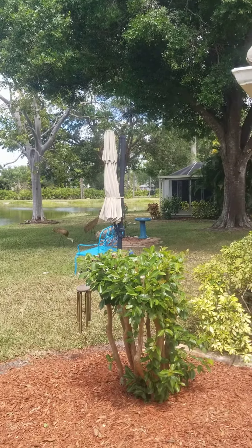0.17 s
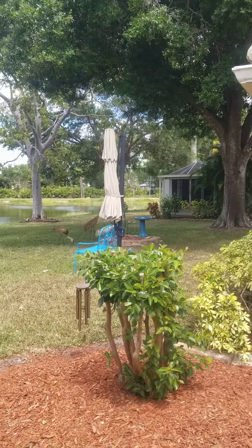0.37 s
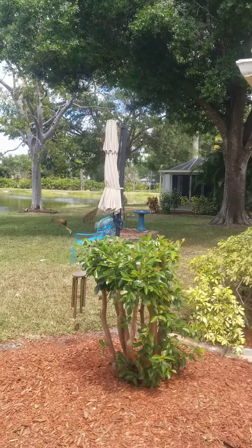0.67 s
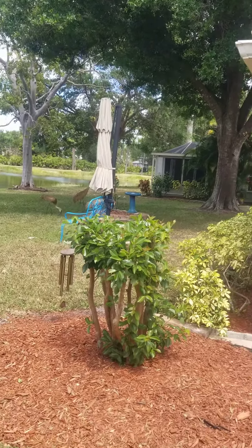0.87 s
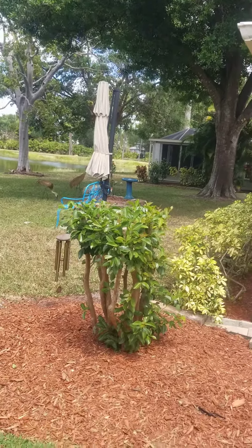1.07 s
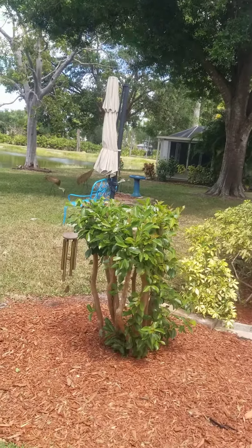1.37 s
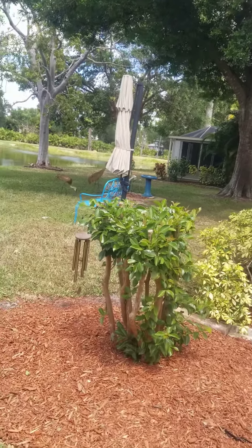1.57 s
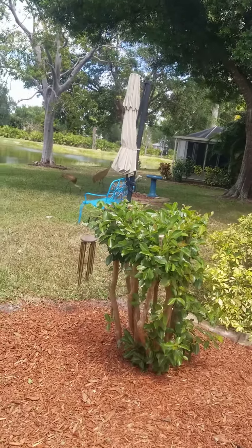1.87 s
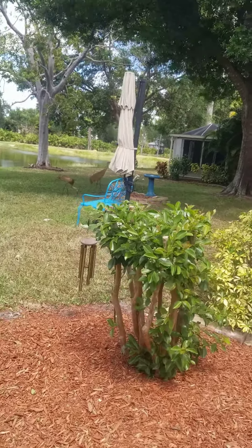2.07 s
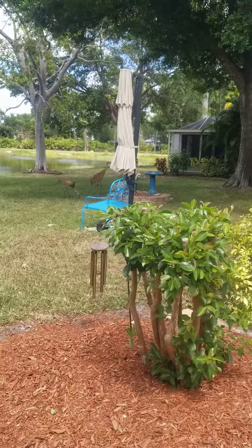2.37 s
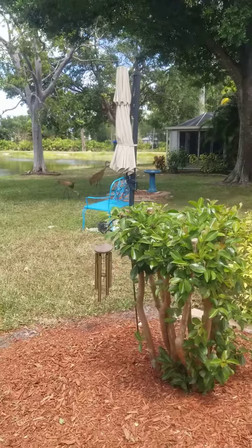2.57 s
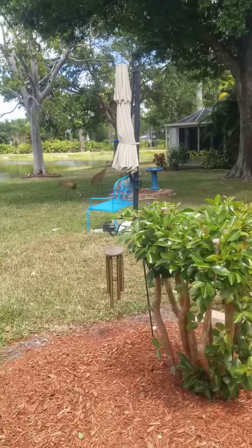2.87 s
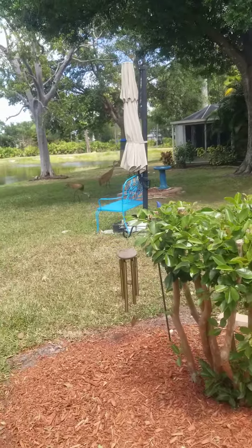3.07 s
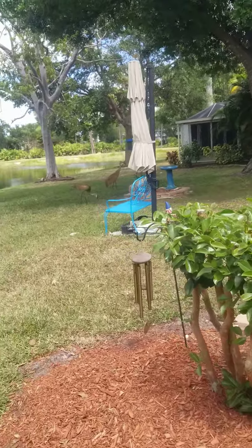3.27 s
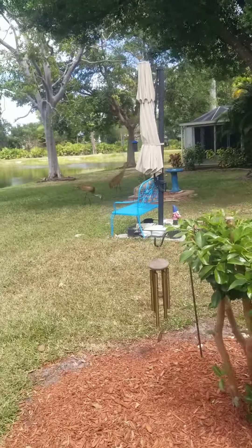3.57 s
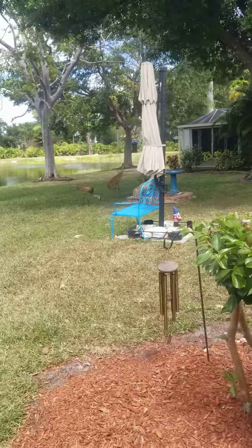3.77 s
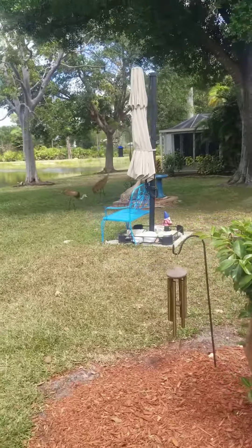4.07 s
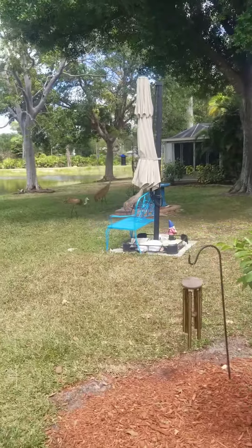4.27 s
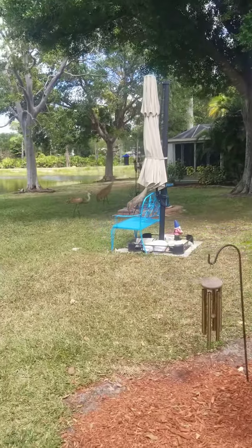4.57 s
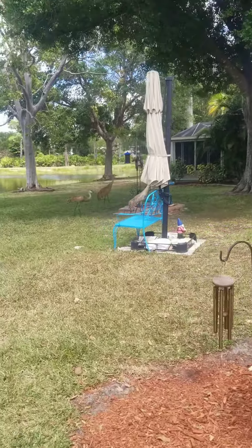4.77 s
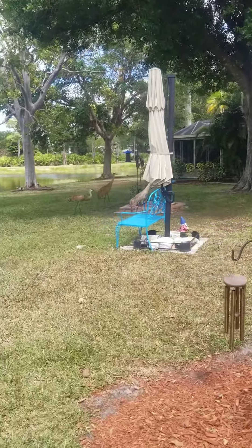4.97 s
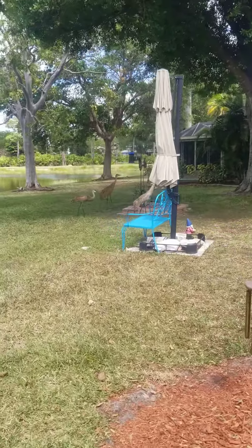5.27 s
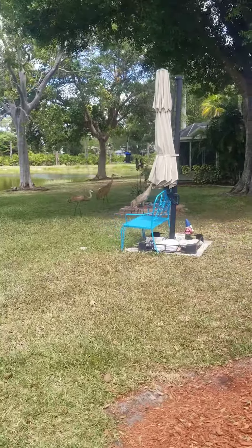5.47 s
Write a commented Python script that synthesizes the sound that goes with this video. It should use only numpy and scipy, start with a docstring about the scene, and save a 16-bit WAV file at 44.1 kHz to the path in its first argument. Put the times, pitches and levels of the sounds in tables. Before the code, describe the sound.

In a windy backyard, a pair of large birds lets out two short bursts of throaty, woody rattling, echoing off trees and a house.

```python
"""Crane duet across a lawn

Two cranes rattle in duet twice. A low held note opens each call; double pulses follow, mellow beats near
790 Hz and raspy beats near 920 Hz overlapping, over soft low beats: swept tones, harmonic stacks, coloured noise.
Trees and a house wall return the calls as dying noise. Wind buffets two microphone ports with low turbulence,
leaves hiss as filtered noise, an insect buzzes once, and gliding sines give far bird notes.
A thin tone wavers near 1567 Hz and one small tick sounds."""
import sys
import numpy as np
from scipy import signal
from scipy.fft import rfft, irfft
from scipy.io import wavfile

SR = 44100
rng = np.random.default_rng(int(sys.argv[2]) if len(sys.argv) > 2 else 0)


def int16_out(signal):
    """Quantize to a 16-bit WAV file."""
    q = np.round(np.clip(np.atleast_2d(signal).T, -1, 1) * 32767)
    wavfile.write(sys.argv[1], SR, q.astype(np.int16))


N = 248283
T = np.arange(N) / SR
SIDES = np.array([[.5], [-.5]])   # shares a left-right difference between the two ports

# Cranes' mellow and raspy rattle beats, each a double pulse: kind, first_top_s, peak_db, pitch_hz,
# rasp_db (before the mix), second_after_ms, second_db (re first)
RATTLE_BEATS = [("mellow 1", 1.0865, -17.5, 800, -37, 8.3, 3),
                ("mellow 1", 1.1562, -15.5, 809, -35, 8.1, 0.7),
                ("mellow 1", 1.2184, -19.5, 800, -34, 7.8, 0.99),
                ("mellow 1", 1.2763, -22.5, 810, -40.5, 8.1, 5),
                ("raspy 1", 1.2855, -24, 880, -38.5, 6.3, 8),
                ("mellow 1", 1.3289, -21.5, 765, -41.5, 8.42, 3),
                ("raspy 1", 1.3533, -19.5, 930, -27, 6.28, 6),
                ("mellow 1", 1.3857, -24.5, 800, -46, 15.4, 0.2),
                ("raspy 1", 1.4142, -18.5, 925, -29, 6.3, 5.6),
                ("raspy 1", 1.4707, -18, 908, -29.5, 6.24, 5.1),
                ("raspy 1", 1.5235, -19.5, 920, -28.5, 5.8, 6.2),
                ("raspy 1", 1.5724, -19.5, 911, -26, 6.64, 5.5),
                ("raspy 1", 1.6175, -21.5, 880, -35, 7.1, 5.4),
                ("mellow 2", 3.6038, -19, 782, -43.5, 9.5, 2.2),
                ("mellow 2", 3.6736, -18, 774, -44, 9.7, 0.71), ("raspy 2", 3.7265, -19, 900, -41, 9.95, 2),
                ("mellow 2", 3.7431, -20.5, 780, -44.5, 6.5, 0.1),
                ("mellow 2", 3.7882, -24, 753, -44, 9.5, -8),
                ("raspy 2", 3.7953, -13, 873, -38.5, 10.9, -2.5),
                ("mellow 2", 3.843, -22.5, 774, -42.5, 9.5, -7.5),
                ("raspy 2", 3.856, -15, 945, -34, 9, -0.7), ("mellow 2", 3.8922, -24.5, 821, -43, 9.3, -10),
                ("raspy 2", 3.9117, -13, 945, -36.5, 10.8, -2.3),
                ("raspy 2", 3.9657, -14.5, 945, -33, 9.6, -1.2),
                ("raspy 2", 4.0165, -21, 945, -36, 9.2, 2.2),
                ("raspy 2", 4.0618, -17.5, 940, -35, 9.3, 0.1),
                ("raspy 2", 4.1066, -20, 816, -48.5, 9.5, -4)]
# What a kind of beat shares within call 1 or 2: first_width_ms and second_width_ms (before widening),
# first_left_right_db, second_left_right_db, second_shift_hz, second_rasp_db (re first),
# third_db (faint third pulse, re second), rasp_width_ms
BEAT_KINDS = {"mellow 1": (6, 6.0, 2, 1.5, -15, -2.5, -9, 5.5),
              "raspy 1": (5.5, 4.6, -0.5, 1, 40, -15, -11, 3.5),
              "mellow 2": (7, 7, 3, 5.5, -12, -3, -24.5, 8.5),
              "raspy 2": (5, 4.5, -2, -0.5, 35, 0.1, -5.5, 4.5)}
# Faint third pulse: delay after the second, width, rasp re second
THIRD_AFTER_S, THIRD_MS, THIRD_RASP_DB = .0068, 2.6, -7
# Overtone level for a 0 dB peak, before the trims; loud pulses are purer (dB per dB)
OVERTONE_DB, OVERTONE_SLOPE = -28, -.6

# Soft low beats, with a faint return closing each call: start_s (the top comes 4.4 ms later),
# second_partial_peak_db, second_partial_hz, first_partial_db (re second)
LOW_BEATS = [(1.104, -32, 1230, -1.5), (1.1722, -32, 1235, -5.5), (1.233, -33, 1260, 1),
             (1.278, -30, 1190, -6.5), (1.333, -33.5, 1170, -8.5), (1.383, -33.5, 1320, -7.5),
             (1.431, -37.5, 1234, 0), (1.661, -43, 1398, 7.5), (3.6197, -34.5, 1237, 1),
             (3.6404, -34.5, 1180, -15.5), (3.693, -32.5, 1180, -14), (3.753, -35, 1250, -18),
             (3.7943, -30.5, 1211, -5), (3.849, -30.5, 1184, -1), (3.896, -34, 1340, 3),
             (4.152, -42, 1301, 5)]
# Two low held notes: second_partial_db (re first), then rows of time_s, level_db (before flutter)
HELD_NOTES = [(-1, [(0.956, -59.5), (0.976, -46), (1.0, -38.5), (1.018, -43), (1.03, -49), (1.06, -55.5),
              (1.08, -50.5)]), (-6, [(3.471, -60), (3.486, -53), (3.497, -47.5), (3.519, -42),
              (3.537, -38.5), (3.552, -54), (3.6, -50)])]
# Partials 3 to 8 of the low voice: level_db (re first, before a trim)
UPPER_PARTIALS_DB = [-15, -18, -20, -28, -30, -33]
# The held note's pitch climbs and settles
OPEN_FROM_HZ, OPEN_TO_HZ, OPEN_RISE_S = 500, 597, .033
# A croak early in the held note over a faint rest: peak, top after the start, width, rest
CROAK_DB, CROAK_TOP_S, CROAK_WIDTH_S, CROAK_REST_DB = -39, .016, .03, -52

# Noise colours of the voices: pitch_hz, relative_db (per Hz)
THROAT_COLOUR = [(500, -13), (1050, 2.5), (1400, -1), (2100, -7), (2500, -24.5), (3000, -16.5),
                 (4500, -23.5), (7000, -37)]   # breath in the voice
RASP_COLOUR = [(2000, -48.5), (3500, -12.5), (5000, -9.5), (8000, -20), (9700, -15), (12200, 0.5),
               (14300, -18), (16200, -9.5)]
CROAK_COLOUR = [(450, -38), (650, 5.5), (800, 11.5), (1000, 1), (1500, -42), (3000, -61)]   # throaty start of the held note
# Port balance: voice noise leans right at low pitches and left at high ones: pitch_hz, left_right_db
VOICE_BALANCE = [(500, -7), (1300, -10.5), (2400, 17.5), (4400, 12.5), (8000, 24.5), (15000, 12)]
# Returns from trees and wall: pitch_hz, t60_s, relative_db
ECHO_BANDS = [(500, 0.48, 7), (756, 0.39, -1.5), (1000, 0.46, 1), (1510, 0.52, 0), (3900, 0.42, 3.5),
              (12000, 0.42, -1.5)]

# Single blows of wind on a port: top_s, peak_db, pitch_hz, width_ms, left_right_db
WIND_BLOWS = [(1.58, -35, 59, 23, 7), (1.82, -26, 58, 21, 0.5), (2.1, -29, 74.5, 38, -12),
              (3.31, -26, 80, 22, 6), (3.39, -28, 70, 20, 10), (4.66, -30, 200, 14, -10),
              (4.676, -20, 75.4, 21, -3), (4.811, -25, 161, 11, 14), (4.825, -26.5, 65.4, 26, -11.5),
              (5.125, -26, 106.7, 22, 11.5), (5.201, -25, 98, 23.6, 11.5), (5.28, -33, 150, 12, -8)]
# Far bird notes: start_s, top_s, end_s, start_hz, top_hz, end_hz, level_db (at the top, before blur), left_right_db
FAR_NOTES = [(1.96, 1.98, 2.09, 2520, 2570, 2800, -61, -2), (2.055, 2.07, 2.11, 4100, 4000, 3850, -63, 5),
             (2.10, 2.12, 2.17, 2790, 2820, 2870, -55, 0), (2.13, 2.23, 2.43, 8600, 8740, 8150, -78, 8),
             (2.44, 2.595, 2.78, 1550, 1505, 1450, -50.5, -5),
             (3.11, 3.16, 3.22, 1060, 1150, 1220, -63, -5), (3.16, 3.19, 3.27, 1600, 1570, 1470, -61, -5),
             (3.38, 3.44, 3.48, 1120, 1220, 1270, -58, -5)]
# Spread of the blur in Hz, then how far below the top a note starts and ends
NOTE_BLUR_HZ, NOTE_RISE_DB, NOTE_FALL_DB = 70, 18, 20
# Insect's attack, hold and release: time_s, level_db (of the main resonance)
INSECT_LEVEL = [(0.43, -105), (0.47, -73.5), (0.61, -73.5), (0.8, -97)]
# Thin wavering tone: time_s, level_db
WHINE_LEVEL = [(0, -73.5), (.9, -86), (1.8, -80), (3.0, -78), (3.45, -86), (4.15, -72), (4.6, -70),
               (5.0, -89.5)]
TICK_S, TICK_DB = 2.153, -55   # top and level before dulling

# Strength of the wind on the ports: time_s, level_db (before lumps and sway)
WIND_LEVEL = [(0.0, -42.5), (0.85, -40), (1.2, -37.5), (1.7, -39.5), (2.1, -36), (2.25, -39.5), (3.17, -39),
              (3.3, -33), (3.5, -32), (3.67, -38.5), (4.2, -36.5), (4.35, -43), (4.62, -41), (4.68, -31),
              (4.77, -37), (4.83, -31), (5.2, -29), (5.3, -35), (5.36, -45), (5.63, -42)]
# Wind turbulence: pitch_hz, relative_db (per Hz)
WIND_COLOUR = [(13, -37.5), (22, -30.5), (54, 4), (103, -0.5), (132, -4), (216, -15.5), (286, -26),
               (420, -34), (550, -40), (920, -120)]
# The ports hear alike in calm and apart in stiff wind; spread and mean of the left-right sway
CALM_DB, STIFF_DB, SWAY_DB, LEAN_DB = -43.5, -30, 5, 2
# Leaves and far noise, before flicker: time_s, murmur_db, rustle_db, hiss_db
AIR_LEVELS = [(0.0, -65.5, -81, -72.5), (1.9, -64, -79, -71), (2.04, -62.5, -82, -70),
              (2.1, -58.5, -71.5, -64.5), (2.4, -62, -70.5, -71.5), (2.66, -61.5, -68.5, -71),
              (2.74, -59.5, -73.5, -67.5), (2.86, -63, -78.5, -70), (3.04, -63, -76.5, -66.5),
              (3.3, -62, -78, -73), (4.35, -63, -81, -73.5), (4.6, -63.5, -80, -66.5),
              (5.17, -66.5, -81, -74), (5.34, -70.5, -81, -76.5), (5.63, -69, -80, -70.5)]
# Colours of the air layers: pitch_hz, relative_db (per Hz)
MURMUR_COLOUR = [(160, -33.5), (280, -13), (660, -14), (980, -19), (1230, -21.5), (1620, -21.5),
                 (1660, -21), (2800, -32.5), (3640, -65.5), (6160, -120)]
RUSTLE_COLOUR = [(2000, -27.5), (2600, -7), (3000, -3), (3500, -6), (4000, -3.5), (4800, -7.5),
                 (6500, -24.5), (9000, -49.5)]
HISS_COLOUR = [(3820, -38.5), (6500, -22), (7490, -24.5), (8690, -19), (9600, -12.5), (12100, -0.5),
               (15200, -9), (16200, -15)]
# Port balance of the air: pitch_hz, left_right_db
AIR_BALANCE = [(60, 3), (180, 0), (550, 0), (1650, 6), (4970, 11.5), (15000, 2.5)]

PORT_LAG = 6   # samples by which the right port hears later
CUTOFF_HZ = 16500


def amp(db):
    """dB to gain."""
    return 10 ** (np.asarray(db) / 20)


def rms_one(x):
    """Scale to rms 1."""
    return x / np.sqrt(np.mean(x ** 2) + 1e-20)


def in_time(rows):
    """Columns of a timed table joined by straight lines."""
    time_s, *columns = np.transpose(rows)
    return [np.interp(T, time_s, column) for column in columns]


def at_hz(points):
    """A pitch table joined along log frequency on the FFT grid."""
    hz, value = np.transpose(points)
    grid_hz = np.arange(N // 2 + 1) * SR / N
    return np.interp(np.log(grid_hz + 1), np.log(hz), value)


def colour(x, spectrum, balance=((100, 0), (200, 0))):
    """Stereo filter from a spectrum and a left-right balance; rms 1."""
    gain = amp(at_hz(spectrum) + SIDES * at_hz(balance))
    return rms_one(irfft(rfft(x) * gain, N))


def band_pass(x, order, low_hz, high_hz):
    """Butterworth band of a sound."""
    return signal.sosfilt(signal.butter(order, [low_hz, high_hz], "band", fs=SR, output="sos"), x)


def drift(rate_hz):
    """Random wander below rate_hz, of rms 1."""
    sos = signal.butter(2, rate_hz, fs=SR, output="sos")
    settle = SR // 2
    return rms_one(signal.sosfilt(sos, rng.standard_normal(N + settle))[settle:])


def hump(top_s, width_s, rise=0.83):
    """Sample span and bell, width at half height; rise under 1 makes the attack steeper than the release."""
    span = slice(int((top_s - 2 * width_s) * SR), int((top_s + 3 * width_s) * SR))
    t = T[span] - top_s
    side_width = width_s * np.where(t < 0, rise, 2 - rise)
    return span, np.exp(-np.log(16) * (t / side_width) ** 2)


def breath(envelope, spectrum, balance):
    """Turbulent air: coloured noise under an envelope, partly shared by the ports, at the envelope's rms."""
    shared = rng.standard_normal(N)
    noise = .5 * shared + .85 * rng.standard_normal((2, N))
    return np.sqrt(np.mean(envelope ** 2)) * colour(envelope * noise, spectrum, balance)


def pulses():
    """Each beat as three pulses, in time order: s, dB, Hz, ms, overtone dB, rasp dB, left-right dB, rasp ms."""
    rows = []
    for kind, s, db, hz, rasp_db, gap_ms, second_db in RATTLE_BEATS:
        ms1, ms2, pan1, pan2, shift_hz, rasp2_db, third_db, rasp_ms = BEAT_KINDS[kind]
        second_s = s + gap_ms / 1000
        second_rasp_db = rasp_db + rasp2_db
        rows += [(s, db, hz, ms1, rasp_db, pan1, rasp_ms),
                 (second_s, db + second_db, hz + shift_hz, ms2, second_rasp_db, pan2, rasp_ms),
                 (second_s + THIRD_AFTER_S, db + second_db + third_db, hz, THIRD_MS,
                  second_rasp_db + THIRD_RASP_DB, (pan1 + pan2) / 2, rasp_ms)]
    return sorted((s, db, hz, ms, OVERTONE_DB + OVERTONE_SLOPE * db, *rest) for s, db, hz, ms, *rest in rows)


def rattle(widen, fall_hz_per_s, clean_db, throat_db, rasp_lead_s):
    """Phase runs on through both cranes' mellow and raspy beats; pulses open it for a few falling cycles."""
    tone, puffs, air_flow = np.zeros((2, N)), np.zeros(N), np.zeros(N)
    rows = pulses()
    s_all, _, hz_all = np.transpose(rows)[:3]
    phase = 2 * np.pi * np.cumsum(np.interp(T, s_all, hz_all)) / SR
    for s, db, hz, ms, over_db, rasp_db, pan_db, rasp_ms in rows:
        span, bell = hump(s, widen * ms / 1000, rise=0.7)
        # the membrane slackens during a beat
        turn = phase[span] - np.pi * fall_hz_per_s * (T[span] - s) ** 2
        # overtones lead the tone by about 1 ms and are shorter
        early = np.roll(bell, -SR // 1000) ** 2.5
        partials = np.sin(2 * turn) + amp(-8.5) * np.sin(3 * turn) + amp(-16.0) * np.sin(4 * turn)
        overtones = amp(over_db + clean_db) * partials
        tone[:, span] += amp(db + SIDES * pan_db) * (bell * np.sin(turn) + early * overtones)
        air_flow[span] += amp(db + over_db + throat_db) * bell
        span, bell = hump(s - rasp_lead_s, rasp_ms / 1000, rise=.5)
        puffs[span] += amp(rasp_db) * bell * (1 + np.cos(phase[span]))   # one puff a cycle
    voice = tone + breath(air_flow, THROAT_COLOUR, VOICE_BALANCE)
    return voice, breath(puffs, RASP_COLOUR, VOICE_BALANCE)


def low_voice(phase, second_db, upper_db):
    """Harmonic stack of a low note: eight partials of one vibration."""
    levels = [0, second_db] + [db + upper_db for db in UPPER_PARTIALS_DB]
    return sum(amp(db) * np.sin((k + 1) * phase + k * k) for k, db in enumerate(levels))


def low_notes(width_s, flutter_db, throat_db, rasp_db, pan_db):
    """Harmonic voice: a held, fluttering note with a noisy croak in it, then soft, breathy beats."""
    voice, air_flow, croak = np.zeros(N), np.zeros(N), np.zeros(N)
    for second_db, rows in HELD_NOTES:
        start_s, end_s = rows[0][0], rows[-1][0]
        on = (T > start_s) & (T < end_s)
        since = np.maximum(T - start_s, 0)
        hz = OPEN_TO_HZ - (OPEN_TO_HZ - OPEN_FROM_HZ) * np.exp(-(since / OPEN_RISE_S) ** 2)
        phase = 2 * np.pi * np.cumsum(hz * (1 + .018 * drift(45))) / SR
        upper_db = -8 * np.exp(-((T - start_s) / .03) ** 2)   # upper partials come in late
        level = on * amp(in_time(rows)[0] + flutter_db * drift(69.6))
        voice += np.sqrt(2) * level * low_voice(phase, second_db, upper_db)
        air_flow += amp(-13) * level
        croak += on * amp(CROAK_REST_DB)
        span, bell = hump(start_s + CROAK_TOP_S, CROAK_WIDTH_S, rise=.6)
        croak[span] += on[span] * amp(CROAK_DB) * bell
    for s, db, second_hz, first_db in LOW_BEATS:
        span, bell = hump(s + 0.0044, width_s)
        phase = np.pi * second_hz * T[span]   # the first partial lies an octave below the second
        voice[span] += amp(db + first_db) * bell * low_voice(phase, -first_db, -1.0)
        air_flow[span] += amp(db) * bell
    voice += breath(croak, CROAK_COLOUR, VOICE_BALANCE)[0]   # same croak at both ports
    throat = amp(throat_db) * breath(air_flow, THROAT_COLOUR, VOICE_BALANCE)
    rasp = amp(rasp_db) * breath(air_flow, RASP_COLOUR, VOICE_BALANCE)
    return voice * amp(SIDES * pan_db) + throat + rasp


def echoes(x, onset_s, alike):
    """Dense returns from trees and walls: noise dying band by band, partly shared by both ports."""
    t = T[:SR]
    shared, tail = rng.standard_normal(SR), np.zeros((2, SR))
    noise = alike * shared + np.sqrt(1 - min(alike, .99) ** 2) * rng.standard_normal((2, SR))
    edges = 300 * 2 ** np.arange(0, 6.1, .5)   # half octaves
    hz, t60, db = np.transpose(ECHO_BANDS)
    for k, (low, high) in enumerate(zip(edges, edges[1:])):
        band = band_pass(np.roll(noise, 999 * k, axis=1), 2, low, high)
        centre = np.sqrt(low * high)
        tail += band * amp(np.interp(centre, hz, db) - 60 * t / np.interp(centre, hz, t60))
    tail *= 1 - np.exp(-(t / onset_s) ** 2)
    tail /= np.sqrt(np.sum(tail ** 2) / 2)   # unit energy, averaged over the ports
    return signal.fftconvolve(x, tail, axes=1)[:, :N]


def buffets():
    """Each blow swings the port membrane for a cycle or two."""
    out = np.zeros((2, N))
    for s, db, hz, ms, pan_db in WIND_BLOWS:
        span, bell = hump(s, ms / 1000)
        swing = np.cos(2 * np.pi * hz * (T[span] - s))
        out[:, span] += amp(db + SIDES * pan_db) * bell * swing
    return out


def far_birds():
    """Gliding whistles blurred by the leaves they pass through."""
    out = np.zeros((2, N))
    for start, top, end, from_hz, top_hz, to_hz, db, pan_db in FAR_NOTES:
        span = slice(int(start * SR), int(end * SR))
        t, corners = T[span], [start, top, end]
        swell = amp(np.interp(t, corners, [db - NOTE_RISE_DB, db, db - NOTE_FALL_DB]))
        phase = 2 * np.pi * np.cumsum(np.interp(t, corners, [from_hz, top_hz, to_hz])) / SR
        # random wander of strength and phase
        blur = .9 + .4 * (drift(NOTE_BLUR_HZ) + 1j * drift(NOTE_BLUR_HZ))[span]
        whistle = np.sqrt(2) * np.imag(blur * np.exp(1j * phase))
        out[:, span] += amp(SIDES * pan_db) * swell * whistle
    return out


def insect(low_hz, high_hz, overtone_db, pan_db):
    """One burst of wing clicks so dense they are noise, in a broad resonance with a weak band near its octave."""
    on = (T > INSECT_LEVEL[0][0]) & (T < INSECT_LEVEL[-1][0])
    noise = rng.standard_normal((2, N))
    resonance = rms_one(band_pass(noise, 4, low_hz, high_hz))
    overtone = rms_one(band_pass(noise, 4, 11700, 13500))
    level = on * amp(in_time(INSECT_LEVEL)[0] + SIDES * pan_db)
    return level * (resonance + amp(overtone_db) * overtone)


def whine(hz, pan_db):
    """A thin sine whose pitch wavers by a few Hz."""
    phase = 2 * np.pi * np.cumsum(hz + 4 * drift(15)) / SR
    return amp(in_time(WHINE_LEVEL)[0] + SIDES * pan_db) * np.sqrt(2) * np.sin(phase)


def tick():
    """One small dry click: a very short noise burst, dulled a little."""
    span, bell = hump(TICK_S, 0.0006)
    out = np.zeros((2, N))
    out[:, span] = amp(TICK_DB + SIDES * 9.5) * bell * rng.standard_normal(len(bell))
    return signal.lfilter([1], [1, -.6], out)


def wind(lumpy_db):
    """Low turbulence, lumpy, swaying between the ports and more separate the harder it blows."""
    db, = in_time(WIND_LEVEL)
    common = np.clip((STIFF_DB - db) / (STIFF_DB - CALM_DB), 0, 1)
    lumps = amp(lumpy_db * np.array([drift(12), drift(12)]))
    own = colour(rng.standard_normal((2, N)), WIND_COLOUR) * lumps
    both = colour(rng.standard_normal(N), WIND_COLOUR)
    sway_db = LEAN_DB + SWAY_DB * drift(8.5)
    return amp(db + SIDES * sway_db) * (np.sqrt(common) * both + np.sqrt(1 - common) * own)


def air(patchy_db):
    """Far murmur, leaf rustle and bright hiss: coloured noises, each flickering a little."""
    murmur_db, rustle_db, hiss_db = in_time(AIR_LEVELS)
    shared = rng.standard_normal(N)
    # level, colour, share of noise common to both ports
    layers = [(murmur_db, MURMUR_COLOUR, .8), (rustle_db, RUSTLE_COLOUR, 0), (hiss_db, HISS_COLOUR, 0)]
    out = np.zeros((2, N))
    for db, spectrum, alike in layers:
        noise = rng.standard_normal((2, N)) + alike * shared
        out += amp(db + patchy_db * drift(2.67)) * colour(noise, spectrum, AIR_BALANCE)
    return out


def scene():
    """Cranes with their returns over wind, far birds, small sounds and air."""
    tone, rasp = rattle(widen=0.93, fall_hz_per_s=23200, clean_db=-2.0, throat_db=-2, rasp_lead_s=.002)
    low = low_notes(width_s=0.011, flutter_db=3.5, throat_db=-5, rasp_db=-16, pan_db=4.5)
    direct = tone + low + amp(-6) * rasp
    sent = amp(-9.0) * tone + amp(-9) * low + amp(-10) * rasp
    returns = echoes(sent, onset_s=0.0045, alike=0.73)
    small = far_birds() + insect(6350, 7440, overtone_db=-7.5, pan_db=24.5) + whine(1567, pan_db=-5.0) + tick()
    return direct + returns + buffets() + small + wind(lumpy_db=3.0) + air(patchy_db=1.63)


def record(dry):
    """Two microphone ports: the right one hears a little later; the top is cut."""
    spaced = np.array([dry[0], np.roll(dry[1], PORT_LAG)])
    top_cut = signal.cheby2(16, 70, CUTOFF_HZ, fs=SR, output="sos")
    return signal.sosfilt(top_cut, spaced)


dry = scene()
out = record(dry)
int16_out(out)
```